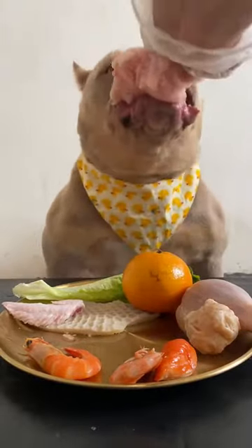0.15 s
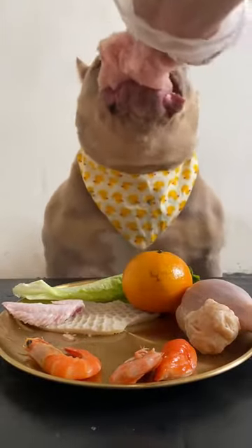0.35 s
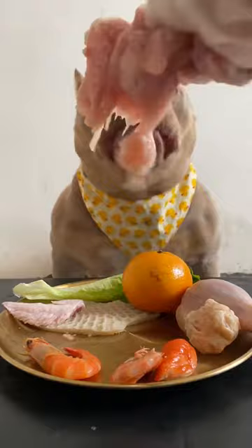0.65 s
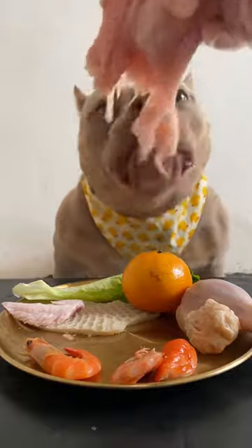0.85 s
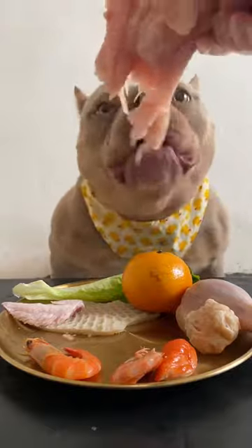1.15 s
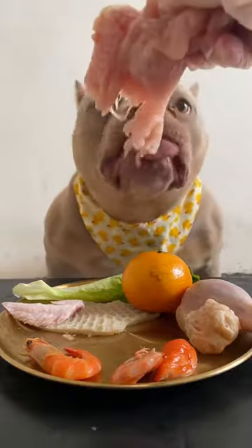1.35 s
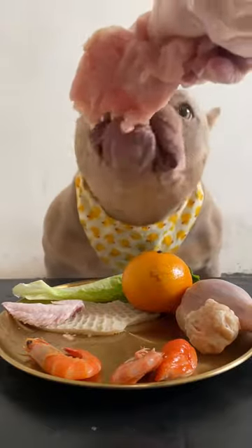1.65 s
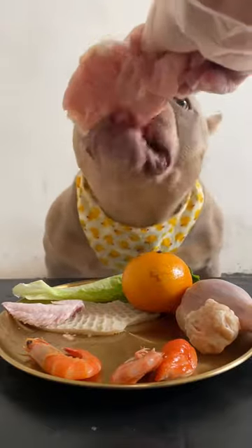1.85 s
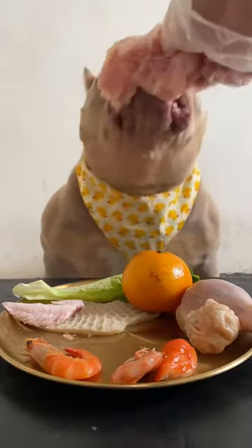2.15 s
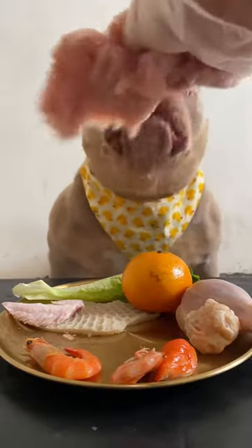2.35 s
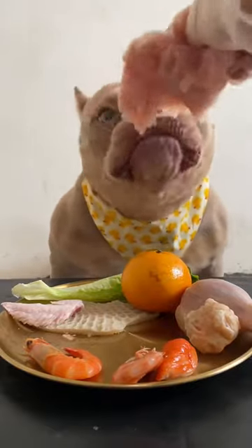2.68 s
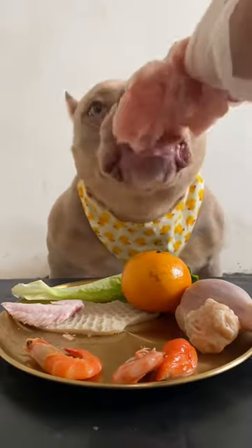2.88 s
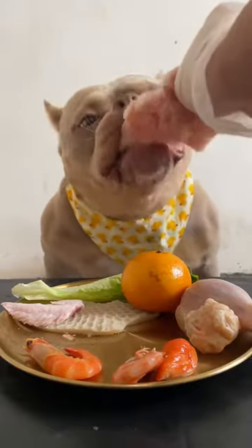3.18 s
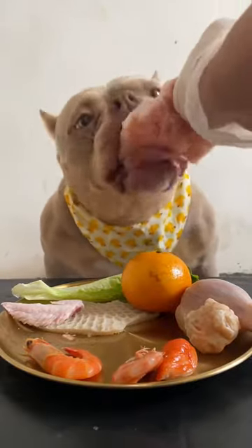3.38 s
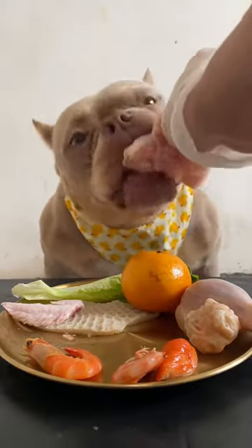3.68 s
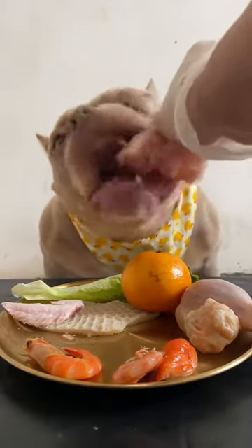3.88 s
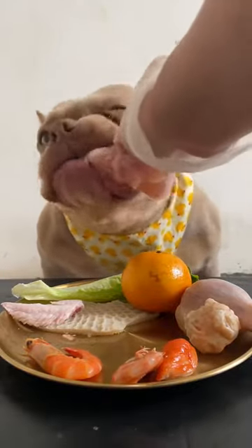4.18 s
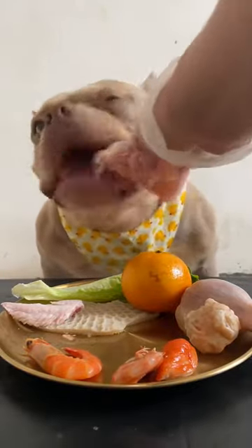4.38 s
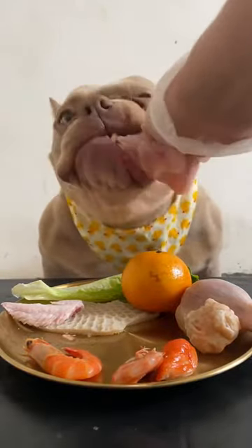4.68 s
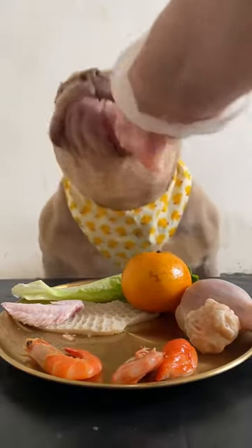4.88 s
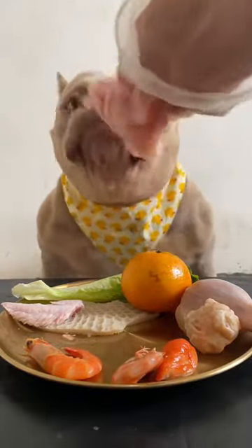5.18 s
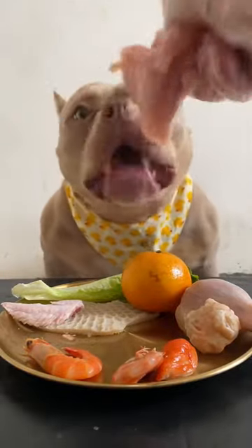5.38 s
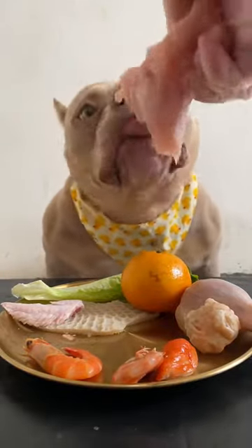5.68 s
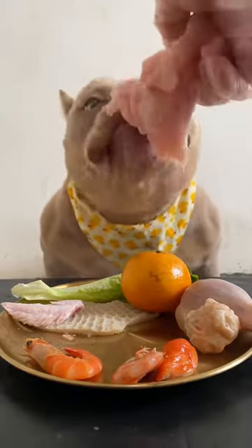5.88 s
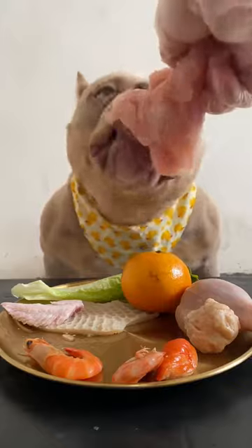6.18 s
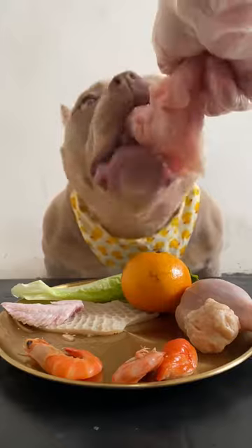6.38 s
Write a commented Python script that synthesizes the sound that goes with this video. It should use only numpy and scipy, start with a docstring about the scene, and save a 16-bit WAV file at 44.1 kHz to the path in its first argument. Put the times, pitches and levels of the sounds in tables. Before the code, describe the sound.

Close, sloppy dog eating: lips smack and click, meat squishes, hollow plops and dull bites thump over a faint room hum.

```python
"""A dog chews raw meat close by in a bare, ringing room, over faint uneven air noise and a low hum.
First come soft wet movements, then from 0.8 s a flurry of smacks: damped rings of mouth cavity and lip gap.
Squelch, crackle and fizz are crowds of damped sines in noise; squishes are runs of resonant snaps.
Bites thud in low knocks and held bass notes, short wavering grunts come at 1.8 s and 4.4 s,
hollow plops glide down in pitch, and two hard bites with a grunt and the loudest plop close the scene."""
import sys
import numpy as np
from scipy import signal
from scipy.fft import rfft, irfft, next_fast_len
from scipy.io import wavfile
from scipy.ndimage import uniform_filter1d, map_coordinates

SR = 44100
rng = np.random.default_rng(int(sys.argv[2]) if len(sys.argv) > 2 else 0)


def dump_mix(stems):
    """Bounce the given channels to the path in sys.argv[1] as a 16-bit WAV at rate SR."""
    frames = np.atleast_2d(stems).T  # one column per channel
    limited = np.clip(frames, -1, 1)  # hard clip at full scale
    pcm = np.round(limited * 32767).astype(np.int16)
    wavfile.write(sys.argv[1], SR, pcm)


N = 288517
TOP_HZ = 16000  # upper band limit

# throat grunts: start_s, length_s, pitch_hz, level_db (rms)
GRUNT_EVENTS = [(1.757, .052, 151, -32.5), (1.81, .1, 207, -35.5), (4.358, .045, 180, -24),
                (4.405, .05, 205, -24.5), (4.435, .04, 270, -31), (6.48, .076, 215, -26)]
# bites, each a push of the jaws that holds and dies away: start_s, hold_s, thud_level_db, jowl_flap_level_db
BITE_EVENTS = [(0.0, 0.036, -50, -48.5), (0.772, 0.034, -48, -41.5), (0.918, 0.031, -33.5, -28),
               (1.247, 0.2, -37, -36.5), (1.748, 0.28, -46, -42), (2.38, 0.1, -49, -48.5),
               (2.619, 0.2, -41, -37.5), (3.051, 0.028, -30, -33.5), (3.148, 0.064, -34, -39),
               (4.235, 0.046, -34.5, -33), (4.3, 0.13, -27.5, -30.5), (4.558, 0.035, -35, -33),
               (4.746, 0.055, -43, -39.5), (5.262, 0.028, -37.5, -43), (5.38, 0.025, -35.5, -33),
               (5.717, 0.049, -43.5, -42.5), (6.005, 0.058, -40.5, -46.5), (6.453, 0.043, -30, -27.5),
               (6.504, 0.061, -26.5, -32)]
# tone colour of large wet pockets in the meat: frequency_hz, relative_level_db (per Hz)
SQUELCH_COLOUR = [(150, -3), (330, -8), (520, 4), (750, 4.5), (1100, 0.5), (1500, -7), (2500, -56)]
# tone colour of small saliva pockets and films: frequency_hz, relative_level_db (per Hz)
CRACKLE_COLOUR = [(800, -13.5), (1400, -5), (1900, 0), (2550, 2.5), (3300, -5.5), (4700, -7.5), (6000, -10),
                  (7500, -76)]
# tone colour of the finest wet spray: frequency_hz, relative_level_db (per Hz)
FIZZ_COLOUR = [(3000, -5), (5000, 2.5), (6200, 3.5), (6800, -34), (7900, -7.5), (8700, 1.5), (11500, -1),
               (13500, -7), (15500, -6.5)]


def amp(db):
    """Decibels to gain."""
    return 10 ** (np.asarray(db) / 20)


def unit(x):
    """Scale to rms 1."""
    return x / np.sqrt(np.mean(x ** 2) + 1e-20)


def along(points, hz):
    """Read (Hz, value) points on a log frequency axis."""
    f, v = np.transpose(points)
    return np.interp(np.log(hz + 1), np.log(f + 1), v)


def filtered(x, response):
    """Shape x by a response given as a function of frequency in Hz."""
    size = x.shape[-1]
    padded = next_fast_len(size + min(size // 4, SR // 2))
    spectrum = rfft(x, padded) * response(np.fft.rfftfreq(padded, 1 / SR))
    return irfft(spectrum, padded)[..., :size]


def coloured(x, spectrum):
    """Shape x by a (Hz, dB) curve, at rms 1."""
    return unit(filtered(x, lambda hz: amp(along(spectrum, hz))))


def resonant(x, centre_hz, q):
    """Pass x through one resonance, at rms 1."""
    def response(hz):
        return 1j * hz / (q * (centre_hz ** 2 - hz ** 2) / centre_hz + 1j * hz)
    return unit(filtered(x, response))


def tinted(x):
    """Give a contact its own irregular resonances: a random curve with a 4.5 dB deviation."""
    points = np.c_[np.geomspace(300, TOP_HZ, 36), rng.normal(0, 4.5, 36)]
    return coloured(x, points)


def patchy(x, depth_db):
    """Roughen the level at random over time and frequency, so the tone colour keeps shifting."""
    bins = signal.stft(x, nperseg=512)[2]
    rows, cols = np.indices(bins.shape)
    patches = rng.standard_normal((40, bins.shape[1] // 7 + 2))
    # patches lie on a nearly logarithmic frequency axis and last seven frames
    field = map_coordinates(patches, [9 * np.log1p(rows / 4), cols / 7], order=1)
    return signal.istft(bins * amp(depth_db * unit(field)), nperseg=512)[1][:len(x)]


def add(track, s, sound):
    """Mix a sound into a track at time s."""
    part = track[max(round(s * SR), 0):][:len(sound)]
    part += sound[:len(part)]


def spread(mid, side):
    """Make left and right: bass alike, treble wide."""
    # stereo width: frequency_hz, gain_db applied to the side signal
    side_gain = [(100, -35), (180, -28), (350, -14), (600, -8), (1100, -9.5), (3000, -8), (6000, -5.5),
                 (9000, -3.5), (13000, -.5)]
    side = filtered(side, lambda hz: amp(along(side_gain, hz)))
    return np.array([mid + side, mid - side])


def strokes(rows, attack_s, falls, rests_db):
    """A gain curve per level column: each stroke rises, holds and falls (dB per s) over a resting level."""
    t = np.arange(N) / SR
    power = np.outer(amp(rests_db) ** 2, np.ones(N))
    for s, hold, *levels_db in rows:
        start = max(int(s * SR), 0)
        age = t[start:start + 3 * SR // 2] - s
        rise = np.clip(age / attack_s, 0, 1)
        after = np.maximum(age - hold, 0)
        for layer, db, fall in zip(power, levels_db, falls):
            layer[start:start + len(age)] += (rise * amp(db - fall * after)) ** 2
    return np.sqrt(power)


def pops(rate, centre_hz, scatter, cycles, size_db):
    """Bursting pockets: damped sines of random time, pitch (+-scatter octaves) and size, rate per second."""
    count = int(rate * N / SR)
    when, pitch, size, push = rng.random((count, 4)).T
    hz = np.clip(centre_hz * 2 ** (scatter * (2 * pitch - 1)), 30, TOP_HZ)[:, None]
    age = np.arange(int(2 * cycles * SR / centre_hz) + 8)
    turns = hz * age / SR
    # many small pockets, few large ones, pushing either way
    gain = np.sign(push - .5) * amp(-size_db * np.log(np.maximum(size, .025)))
    decay = amp(-40 * turns / cycles)  # 40 dB down after the given cycles
    waves = gain[:, None] * np.sin(2 * np.pi * turns) * decay
    where = (when * N).astype(int)[:, None] + age
    return unit(np.bincount(where.ravel(), waves.ravel(), N)[:N])


def wet(grains, spectrum, wash_db):
    """Set near grains in a noise wash at the centre, with diffuse noise at the sides."""
    mid, side = rng.standard_normal((2, N))
    near = patchy(grains + amp(wash_db) * mid, 4.2)
    return spread(coloured(near, spectrum), coloured(side, spectrum))


def room_tone():
    """Faint, uneven air noise as shaped random noise, and a low hum of steady sines."""
    # air noise colour: frequency_hz, relative_level_db (per Hz)
    air_colour = [(10, -50), (25, -39), (55, 8.5), (85, -15), (145, -25), (320, -15.5), (650, -30),
                  (1000, -19.5), (2500, -18), (6000, -22), (7300, -74), (9000, -48), (15500, -29)]
    # steady room hum: pitch_hz, level_db (rms)
    hum_lines = [(87, -51), (144, -63)]
    t = np.arange(N) / SR
    hum = sum(amp(db) * unit(np.sin(2 * np.pi * hz * t)) for hz, db in hum_lines)
    air = [coloured(patchy(noise, 3), air_colour) for noise in rng.standard_normal((2, N))]
    return hum + amp(-54) * spread(*air)


def standing_waves(hz):
    """Narrow room modes lift the bass as resonances added to the plain response."""
    # standing waves of the room: pitch_hz, width_hz, peak_gain_db
    modes = [(60, 1.6, 3), (88.1, 1.3, 13), (143.8, 4.4, 7.5), (187, 2.2, -4), (214, 2, 6)]
    return 1 + sum(amp(db) * 1j * hz * width / (centre ** 2 - hz ** 2 + 1j * hz * width)
                   for centre, width, db in modes)


def boom(build_s=0.04):
    """Bites and grunts feed energy to the room's bass notes, which ring on as clean, slowly fading lines."""
    # held bass notes: pitch_hz, t60_s, level_db over the thud, level_db over a grunt
    bass_notes = [(57, 2.2, -14, -40), (87.6, 2.7, -3, -30), (144, 1.6, -12.5, -10), (186.5, 1.1, -15, -11),
                  (207, 1.4, -12, -9)]
    t = np.arange(N) / SR
    bites, throat = np.zeros((2, N))
    for s, _, thud_db, _ in BITE_EVENTS:
        add(bites, s + build_s, [amp(thud_db) ** 2])
    for s, length, _, db in GRUNT_EVENTS:
        add(throat, s + length, [amp(db) ** 2])
    # each point of energy is spread over twice build_s
    bites, throat = uniform_filter1d([bites, throat], int(2 * build_s * SR))
    out = np.zeros(N)
    for hz, t60, bite_db, grunt_db in bass_notes:
        feed = amp(bite_db) ** 2 * bites + amp(grunt_db) ** 2 * throat
        energy = np.abs(signal.lfilter([1], [1, -amp(-60 / t60 / SR) ** 2], feed))
        out += np.sqrt(energy) * np.sin(2 * np.pi * hz * t)
    return out


def room(x, early_t60=0.1, early_db=-13, tail_db=-5):
    """Table and near wall answer in a short noise decay, then the bare room rings on in noise and modes."""
    # decay time of the room: frequency_hz, t60_s
    decay_times = [(100, 2.48), (600, 0.82), (2500, 1.2), (6000, 0.55), (14000, 0.68)]
    # higher room modes that ring in the tail: pitch_hz, level_db (rms, against the noise tail)
    ringing_modes = [(371, -23), (495, -21), (640, -21), (910, -23), (1191, -26)]
    hz, t, bins = signal.stft(rng.standard_normal((2, SR * 3 // 2)), SR, nperseg=256)
    fading = bins * amp(-60 * t / along(decay_times, hz)[:, None])
    tail = signal.istft(fading, SR, nperseg=256)[1]
    age = np.arange(tail.shape[1]) / SR
    early = rng.standard_normal(tail.shape) * amp(-60 * age / early_t60) * (age > .002)
    rings = np.zeros(len(age))
    for f, db in ringing_modes:
        rings += amp(db) * unit(np.sin(2 * np.pi * f * age) * amp(-60 * age / along(decay_times, f)))
    tail = unit(tail) + np.outer([1, 0], rings)  # modes at the centre only
    answer = amp(tail_db) * tail / np.linalg.norm(tail[0])
    answer = answer + amp(early_db) * early / np.linalg.norm(early[0])
    return spread(*signal.fftconvolve(x[None], answer, axes=1)[:, :N])


def near_field(x, t60=0.011, side_db=-7):
    """Direct sound scatters off plate and table, so a short noise decay makes left and right differ."""
    age = np.arange(SR // 100) / SR
    scatter = rng.standard_normal(len(age)) * amp(-60 * age / t60)
    side = signal.oaconvolve(x, scatter / np.linalg.norm(scatter))[:N]
    return spread(x, amp(side_db) * side)


def jaws(width_db=2):
    """Soft irregular knocks of jaw and jowls: low damped sines through the room's standing waves."""
    # jaw thud colour: frequency_hz, relative_level_db (per Hz)
    thud_colour = [(8, -60), (24, -40), (42, -49), (57, -1), (100, 2), (125, 0.5), (190, -78)]
    # jowl flap colour: frequency_hz, relative_level_db (per Hz)
    flap_colour = [(80, -12.5), (135, -2.5), (200, 0), (290, 4), (380, -7.5), (600, -65)]
    # the resting levels keep the jaws moving between bites
    thud_gain, flap_gain = strokes(BITE_EVENTS, attack_s=.0051, falls=[49, 55.5], rests_db=[-50, -57.5])
    thud = filtered(pops(rate=160, centre_hz=75, scatter=.9, cycles=3, size_db=.8), standing_waves)
    flap = filtered(pops(rate=320, centre_hz=220, scatter=1.0, cycles=4, size_db=.8), standing_waves)
    thud_noise, flap_noise = rng.standard_normal((2, N))
    mid = thud_gain * coloured(thud, thud_colour) + flap_gain * coloured(flap, flap_colour)
    # diffuse boom at the sides
    side = thud_gain * coloured(thud_noise, thud_colour) + flap_gain * coloured(flap_noise, flap_colour)
    return spread(mid, amp(width_db) * side)


def grunts(sag=0.075, jitter=0.033, overtone_db=-13):
    """Short muffled throat tones: three harmonics whose pitch wavers and sags."""
    out = np.zeros(N)
    for s, length, hz, db in GRUNT_EVENTS:
        u = np.linspace(0, 1, int(length * SR))
        waver = np.interp(u, np.linspace(0, 1, 8), rng.standard_normal(8))
        pitch = hz * (1 - sag * (u - .5) + jitter * waver)
        phase = 2 * np.pi * np.cumsum(pitch) / SR
        tone = sum(amp(overtone_db * k) * np.sin((k + 1) * phase) for k in range(3))
        add(out, s, amp(db) * unit(tone * signal.windows.tukey(len(u), .5)))
    return out


def plops():
    """A pocket of air swells into a hollow tone that drops in pitch as the mouth closes on it."""
    # air pockets squeezed by tongue and jowls: start_s, swell_s, start_pitch_hz, end_pitch_hz, peak_level_db
    air_pockets = [(0.9223, 0.0063, 690, 169, -25), (.991, 0.0047, 590, 332, -23),
                   (1.257, 0.005, 533, 390, -37), (2.2415, 0.0029, 616, 454, -26.5),
                   (2.413, 0.0026, 760, 560, -31), (2.4262, 0.0017, 850, 637, -21),
                   (2.635, 0.0051, 760, 417, -30.5), (2.643, 0.003, 690, 505, -26),
                   (2.7273, 0.0017, 990, 480, -19.5), (3.054, 0.0054, 674, 170, -29),
                   (4.0743, 0.0014, 860, 720, -18), (4.242, 0.0041, 1020, 101, -21.5),
                   (4.31, 0.011, 114, 80, -25), (4.366, 0.01, 327, 170, -30),
                   (5.377, 0.0026, 630, 407, -25.5), (5.644, 0.00096, 650, 540, -24),
                   (5.7165, 0.0041, 863, 507, -17.5), (5.7243, 0.0051, 546, 442, -15),
                   (5.757, 0.0074, 460, 430, -26), (6.455, 0.0053, 800, 120, -27.5),
                   (6.483, 0.0057, 286, 220, -15.5), (6.5, 0.0058, 280, 193, -11)]
    out = np.zeros(N)
    for s, swell_s, start_hz, end_hz, db in air_pockets:
        u = np.arange(int(4 * swell_s * SR)) / SR / swell_s
        pitch = end_hz + (start_hz - end_hz) * np.exp(-u)
        phase = 2 * np.pi * np.cumsum(pitch) / SR
        swell = u * np.exp((1 - u * u) / 2)  # peaks at u = 1
        add(out, s, amp(db) * swell * np.sin(phase))
    return out


def squishes(q=3.35, snaps_per_s=550, smear_db=-15):
    """Wet fibres give way in a swelling run of tiny snaps: random impulses in noise through a resonance."""
    # meat torn or squeezed: centre_s, length_s, resonance_hz, tearing_level_db, spray_level_db
    tears = [(0.29, 0.06, 2350, -48.5, -51), (.495, 0.048, 520, -43.5, -42), (0.535, 0.094, 2160, -53, -47),
             (0.939, 0.029, 3900, -36.5, -34), (1.287, 0.071, 3360, -40.5, -43.5),
             (1.642, 0.011, 6000, -58, -34.5), (1.772, 0.034, 6400, -63, -45),
             (2.277, 0.034, 3300, -50.5, -48), (2.565, 0.012, 5570, -43, -41),
             (2.574, 0.018, 2900, -35, -50.5), (2.723, 0.042, 390, -35, -40), (2.74, 0.034, 6300, -55, -46),
             (2.873, 0.033, 2250, -37, -48), (3.048, 0.031, 3060, -44, -47),
             (3.184, 0.045, 4260, -42, -46.5), (3.344, 0.055, 5700, -50, -48),
             (3.512, 0.021, 3000, -44.5, -40.5), (3.724, 0.036, 2600, -43.5, -42.5),
             (3.927, 0.029, 4930, -56, -36.5), (3.971, 0.046, 1070, -41, -64),
             (3.988, 0.025, 2490, -34, -57), (4.039, 0.043, 920, -43, -44.5),
             (4.122, 0.085, 545, -42, -51.5), (4.161, 0.023, 3340, -41.5, -47),
             (4.287, 0.053, 3930, -37.5, -36), (4.384, 0.053, 700, -33.5, -61),
             (4.43, 0.037, 1960, -36, -33.5), (4.687, 0.024, 2000, -39.5, -59),
             (4.839, 0.032, 1860, -45.5, -44), (4.969, 0.058, 5400, -78, -49),
             (5.038, 0.046, 530, -45.5, -58), (5.464, 0.12, 3900, -43, -43.5),
             (5.619, 0.029, 2850, -38.5, -45.5), (5.795, 0.035, 454, -33, -67),
             (5.797, 0.039, 2550, -41, -39.5), (5.933, 0.043, 2500, -34.5, -39.5),
             (5.987, 0.039, 5370, -43.5, -36.5), (6.127, 0.044, 2650, -36.5, -55),
             (6.474, .045, 3940, -37, -39.5), (6.523, .012, 2200, -39, -41)]
    out = np.zeros(N)
    for s, length, hz, tear_db, spray_db in tears:
        size = int(1.6 * length * SR)  # window runs past the audible length
        hits = rng.random(size) < snaps_per_s / SR
        snaps = rng.standard_normal(size) * (amp(smear_db) + hits)
        tearing = resonant(resonant(snaps, hz, q), hz, 1.0)
        spray = coloured(tinted(snaps), FIZZ_COLOUR)
        sound = amp(tear_db) * tearing + amp(spray_db) * spray
        add(out, s - size / SR / 2, sound * np.hanning(size))
    return out


def chewing(tick_db=-14):
    """Meat squeezed by teeth and tongue: large pockets squelch, small ones crackle, tick and fizz."""
    # chewing strokes: start_s, hold_s, squelch_level_db, crackle_level_db, fizz_level_db
    squeezes = [(.26, 0.025, -54.5, -51.5, -68), (.47, 0.019, -49, -44.5, -55),
                (.73, 0.044, -47.5, -53, -58.5), (.91, 0.19, -40, -44, -56), (1.05, 0.37, -43, -53, -52),
                (1.45, 0.02, -50, -41.5, -44), (1.795, 0.14, -53, -60, -54),
                (1.95, 0.31, -50.5, -52, -55.5), (2.24, 0.04, -44.5, -56.5, -67),
                (2.635, 0.02, -36.5, -51, -60), (2.695, 0.041, -34.5, -60, -61),
                (3.04, 0.18, -46, -50, -49), (3.25, 0.3, -53, -51, -51), (3.66, 0.1, -49.5, -62, -56.5),
                (3.87, 0.013, -70, -42, -49), (3.92, 0.14, -69, -66, -54), (4.25, 0.25, -42.5, -42.5, -45),
                (4.61, 0.072, -46, -59.5, -62), (4.78, 0.047, -48, -71, -93),
                (5.39, 0.083, -41.5, -45.5, -48), (5.75, 0.085, -40.5, -61, -49.5),
                (5.91, 0.04, -39, -40, -64), (6.09, 0.023, -42, -46, -52), (6.28, 0.023, -60, -65, -52),
                (6.452, 0.061, -41, -42, -45)]
    # the resting levels leave saliva moving between strokes
    gains = strokes(squeezes, attack_s=.015, falls=[90, 119, 95], rests_db=[-68, -79, -60])
    squelch = pops(rate=480, centre_hz=720, scatter=1.1, cycles=4, size_db=2.2)
    crackle = pops(rate=450, centre_hz=2700, scatter=1.0, cycles=4, size_db=3.7)
    fizz = pops(rate=2000, centre_hz=8500, scatter=.9, cycles=7, size_db=3.2)
    # stray threads of saliva snap one by one, at the centre
    ticks = pops(rate=45, centre_hz=3000, scatter=.67, cycles=7, size_db=4.0)
    layers = [wet(squelch, SQUELCH_COLOUR, wash_db=-3),
              wet(crackle, CRACKLE_COLOUR, wash_db=-6) + amp(tick_db) * ticks,
              wet(fizz, FIZZ_COLOUR, wash_db=-1)]
    return sum(gain * layer for gain, layer in zip(gains, layers))


def smacks(cavity_t60=0.018, lip_t60=0.016, spray_t60=0.024, upper_ratio=1.386, upper_db=-9,
           closing=0.11, closing_s=0.002, peel_s=0.023, peel_db=-18, snap_cycles=2,
           slop_db=-15, tear_db=-8, snap_db=10):
    """Lips peel apart, then the wet seal breaks: cavity and lip gap ring, and the saliva film tears to spray."""
    # lip and tongue smacks: break_s, cavity_hz, cavity_level_db, lip_gap_hz, lip_level_db, spray_level_db
    # (each level is the energy as an rms over 10 ms)
    lip_breaks = [(.299, 900, -66, 2420, -51, -64), (.497, 513, -54, 1360, -44, -39),
                  (0.768, 550, -45, 2310, -58, -55), (0.839, 627, -27, 2820, -28, -33.5),
                  (0.85, 625, -44, 2370, -36, -55), (0.883, 880, -46, 2470, -37, -35.5),
                  (.9215, 630, -29.5, 2870, -41, -48), (.99, 700, -46, 5740, -36, -38),
                  (1.0833, 705, -36.5, 1510, -44, -64), (1.122, 604, -33, 2320, -42, -43),
                  (1.1407, 1123, -24.5, 1900, -23.5, -37), (1.143, 640, -27, 1690, -26, -36),
                  (1.156, 700, -42, 4300, -43, -60), (1.28, 660, -32.5, 5000, -39, -56),
                  (1.568, 394, -63, 3110, -30, -46), (1.5998, 704, -50, 2640, -42, -56),
                  (1.603, 700, -50, 3330, -44, -44), (1.6552, 1110, -44, 3270, -35.5, -39),
                  (1.6659, 1180, -38, 2480, -22.5, -52), (1.7925, 1020, -30, 2220, -35, -46),
                  (1.7941, 708, -21, 1100, -45, -56), (1.867, 710, -47, 9650, -42.5, -50),
                  (2.243, 690, -33.5, 1480, -51, -50), (2.4528, 663, -30, 1770, -36, -44.5),
                  (2.4844, 417, -42, 2690, -33.5, -45), (2.507, 700, -53, 3420, -48, -43.5),
                  (2.574, 630, -33.5, 2860, -44, -45), (2.6364, 740, -34, 1590, -44, -49),
                  (2.6821, 566, -34, 2430, -29.5, -31), (2.728, 930, -34, 1400, -46, -49),
                  (2.766, 550, -37, 1500, -52, -64), (2.9711, 1280, -39, 1460, -41, -52),
                  (3.033, 695, -41, 2940, -45, -44), (3.2739, 725, -40.5, 2540, -37.5, -72),
                  (3.325, 800, -60, 2800, -45, -40), (3.345, 620, -40.5, 1920, -56, -45),
                  (3.3973, 696, -39.5, 1870, -41, -44), (3.465, 1310, -44, 2600, -41, -37.5),
                  (3.4736, 1060, -49, 2700, -37.5, -37.5), (3.664, 1210, -43.5, 2730, -40, -38),
                  (3.6922, 1100, -75, 2670, -41, -46), (3.7535, 1126, -40.5, 2830, -46.5, -46),
                  (3.775, 615, -45, 2500, -53, -48), (3.9439, 1180, -33, 2700, -31, -26.5),
                  (3.951, 1080, -42, 3150, -38, -48), (3.9813, 970, -51, 2880, -38, -55),
                  (3.991, 1100, -63, 2730, -35, -52), (4.1658, 577, -35, 3230, -53, -48),
                  (4.187, 760, -38, 2400, -60, -64), (4.22, 660, -40, 3080, -39.5, -44),
                  (4.241, 1000, -34.5, 2220, -38, -40.5), (4.281, 597, -35, 2360, -36, -54),
                  (4.3621, 600, -27.5, 2470, -36, -59), (4.402, 610, -31.5, 2330, -45, -50),
                  (4.4247, 510, -38, 2090, -38, -40), (4.457, 1200, -38, 2000, -46, -37),
                  (4.492, 595, -54, 2670, -53, -41), (4.4371, 380, -35, 2050, -38, -43),
                  (4.554, 534, -42, 1850, -36, -50), (4.7786, 443, -38, 1930, -63, -85),
                  (4.91, 407, -60, 5550, -42.5, -49), (5.1034, 408, -48.5, 5250, -47, -55.5),
                  (5.264, 500, -41, 2800, -42, -50), (5.3216, 710, -31, 1270, -39.5, -55),
                  (5.377, 790, -38, 2360, -42.5, -45), (5.4037, 645, -29.5, 2370, -38, -45),
                  (5.419, 496, -34, 2400, -37, -40), (5.444, 710, -41, 4300, -39, -53),
                  (5.468, 710, -48, 4430, -38.5, -46), (5.475, 1170, -35, 2000, -55, -54),
                  (5.503, 1170, -40, 3730, -37, -44), (5.424, 1360, -36, 1500, -36, -43),
                  (5.485, 1130, -32.5, 1380, -61, -59), (5.5657, 875, -55, 2690, -37.5, -63),
                  (5.6596, 900, -25, 1480, -40, -31.5), (5.717, 1205, -30.5, 1390, -37, -60),
                  (5.727, 1065, -27, 1670, -38.5, -62), (5.784, 486, -48, 2460, -32.5, -56),
                  (5.827, 900, -40.5, 2700, -47, -42.5), (6.056, 675, -43, 2250, -41, -60),
                  (6.09, 750, -41.5, 1510, -43.5, -68), (5.939, 1030, -37, 2400, -35, -46),
                  (6.1323, 760, -29, 2870, -38.5, -46.5), (6.24, 1380, -50, 1610, -39, -57),
                  (6.274, 900, -71, 5100, -51, -50), (6.322, 1260, -42.5, 2330, -46, -39.5),
                  (6.443, 1070, -39.5, 2580, -33.5, -30), (6.456, 880, -35, 2290, -39, -43)]
    # saliva spray colour: frequency_hz, relative_level_db (per Hz)
    spray_colour = [(2000, -17), (3500, 9.5), (5000, 6), (6200, 11.5), (7300, -7), (8700, 5.5),
                    (11500, 2.5), (13500, -3), (15500, -4)]
    out = np.zeros(N)
    t = np.arange(-SR // 50, SR // 25) / SR
    age = np.maximum(t, 0)

    def burst(x):
        """Scale to the energy of 10 ms at rms 1."""
        return x / np.sqrt(np.sum(x ** 2) / (SR / 100))

    def fade(t60, rise):
        """Quick rise at the break, then exponential decay."""
        return amp(-60 * age / t60) * (1 - np.exp(-age / rise))

    peel = amp(peel_db - 20 * np.abs(t) / peel_s)  # sticky creep on either side of the break
    # the resonances sink as the lips close again
    sinking = 1 + closing * (np.exp(-age / closing_s) - .5)
    phase = 2 * np.pi * np.cumsum(sinking) / SR
    phase -= phase[SR // 50]
    lip_fade = fade(lip_t60, .0003)
    for s, cavity_hz, cavity_db, lip_hz, lip_db, spray_db in lip_breaks:
        tear, mist = rng.standard_normal((2, len(t)))
        detune, turn = rng.standard_normal(2)
        upper_hz = cavity_hz * (upper_ratio + 0.095 * detune)
        ring = np.sin(cavity_hz * phase) + amp(upper_db) * np.sin(upper_hz * phase)
        slop = coloured(mist, SQUELCH_COLOUR)
        cavity = (ring + amp(slop_db) * slop) * fade(cavity_t60, 0.00091) + amp(-3.5) * slop * peel
        film = resonant(coloured(tinted(tear), CRACKLE_COLOUR), lip_hz, q=1.0)
        snap = amp(snap_db) * np.exp(-(lip_hz * (t - .0013) / snap_cycles) ** 2)  # the last thread parts
        lip_gain = snap + lip_fade
        lip = np.sin(lip_hz * phase + turn) * lip_gain
        lip += film * (amp(tear_db) * lip_gain + amp(3) * peel)
        spray = coloured(tinted(mist), spray_colour) * (fade(spray_t60, 0.0018) + amp(-3.5) * peel)
        sound = amp(cavity_db) * burst(cavity) + amp(lip_db) * burst(lip) + amp(spray_db) * burst(spray)
        add(out, s + t[0], sound)
    return out


def scene(plop_wet_db=-6, pan_db=.7):
    """The dog's mouth sits just right of centre, over centred jaws, boom and room tone."""
    # how much the room picks up: frequency_hz, gain_db
    room_pickup = [(200, -2), (450, -3.5), (1200, 0.5), (2500, 0.5), (6000, -1.5)]
    mouth = smacks() + squishes() + grunts()
    hollow = plops()
    to_room = filtered(mouth + amp(plop_wet_db) * hollow, lambda hz: amp(along(room_pickup, hz)))
    voice = near_field(mouth + hollow) + room(to_room) + chewing()
    return voice * amp([[-pan_db], [pan_db]]) + jaws() + boom() + room_tone()


def record(dry):
    """Nothing is kept above the band limit."""
    return filtered(dry, lambda hz: hz < TOP_HZ)


dry = scene()
out = record(dry)
dump_mix(out)
```